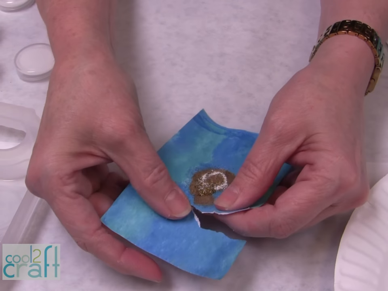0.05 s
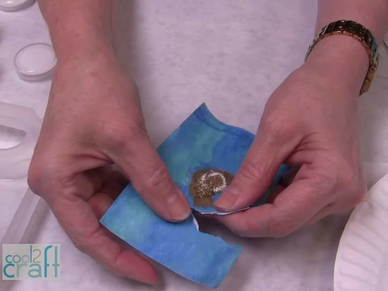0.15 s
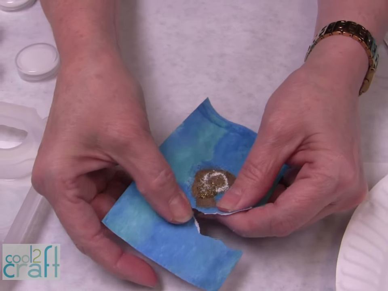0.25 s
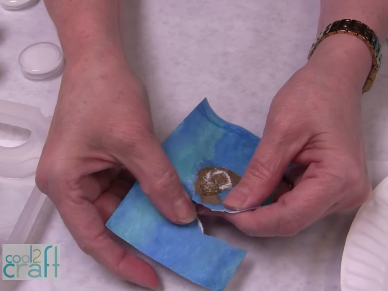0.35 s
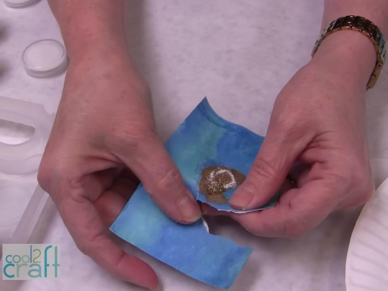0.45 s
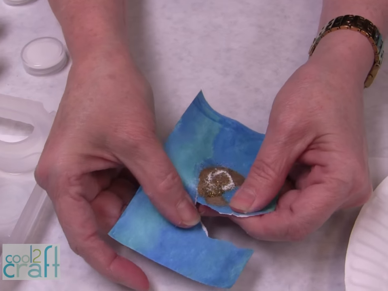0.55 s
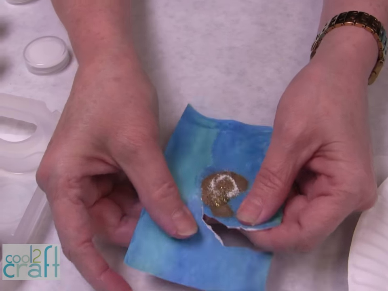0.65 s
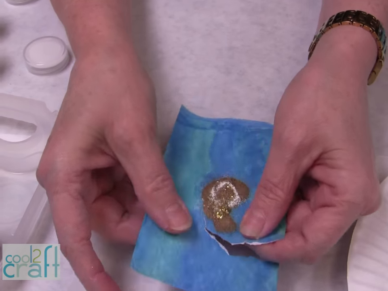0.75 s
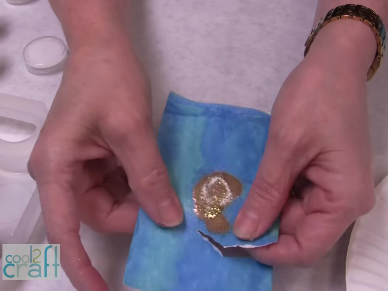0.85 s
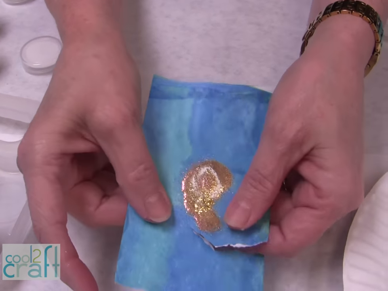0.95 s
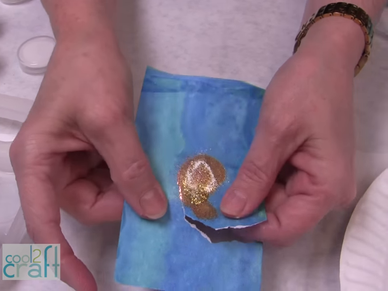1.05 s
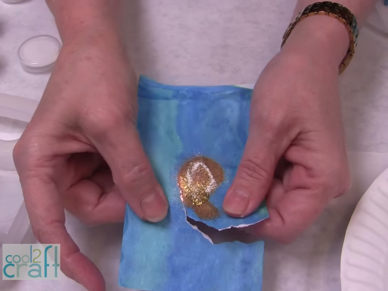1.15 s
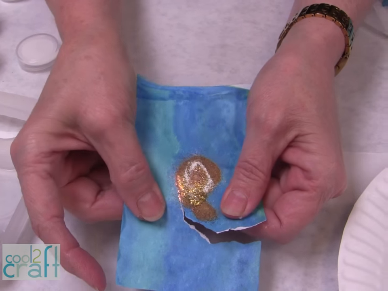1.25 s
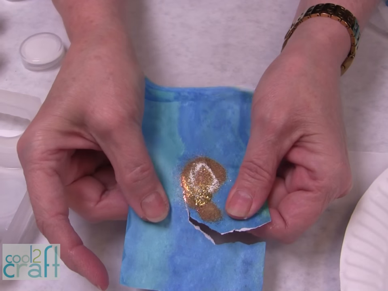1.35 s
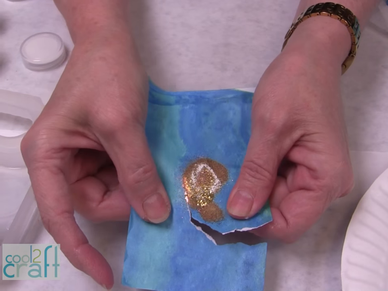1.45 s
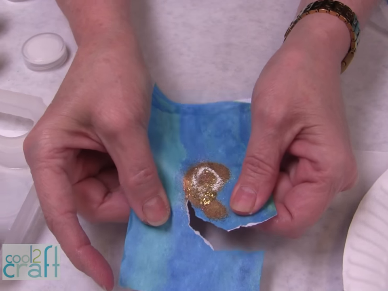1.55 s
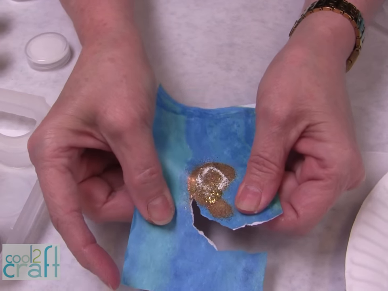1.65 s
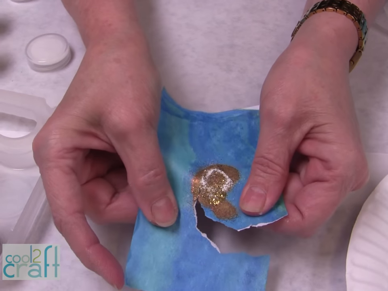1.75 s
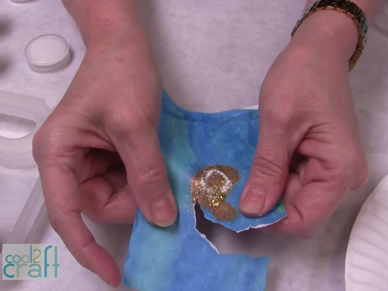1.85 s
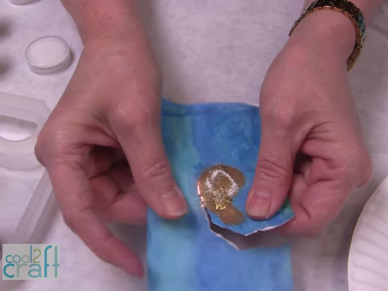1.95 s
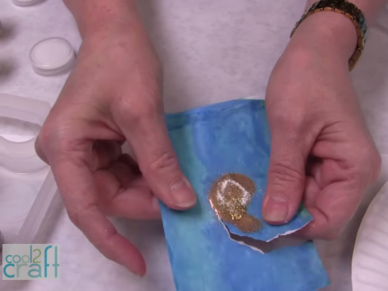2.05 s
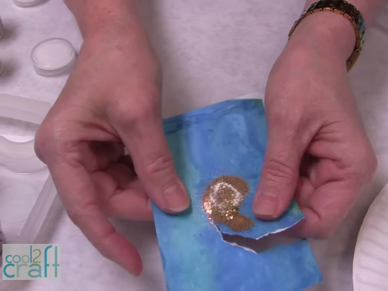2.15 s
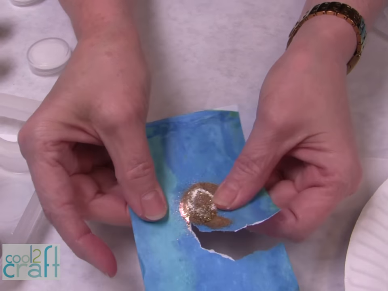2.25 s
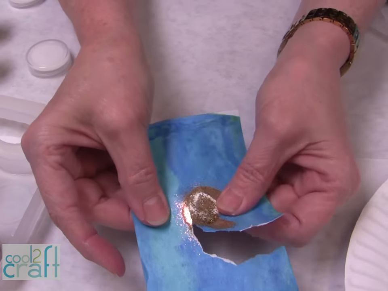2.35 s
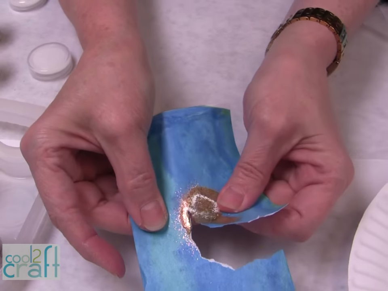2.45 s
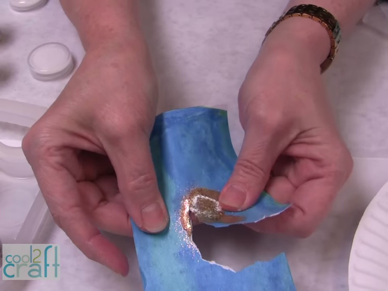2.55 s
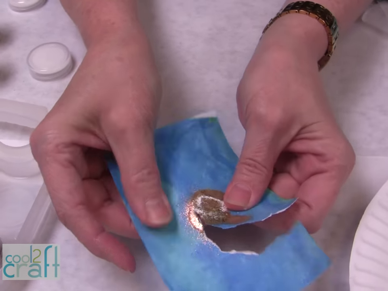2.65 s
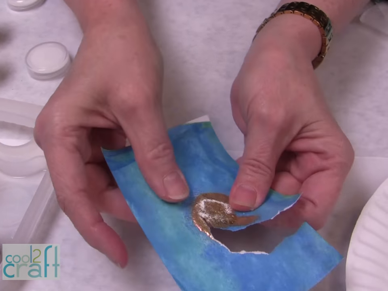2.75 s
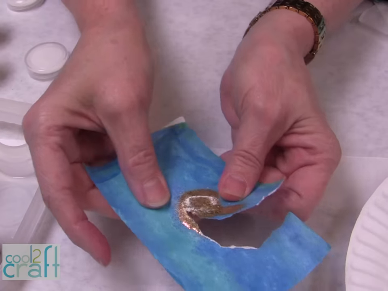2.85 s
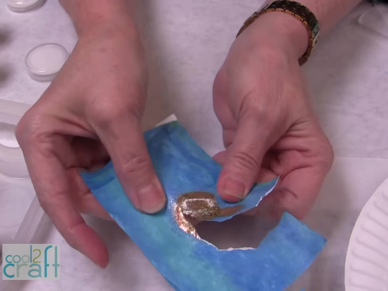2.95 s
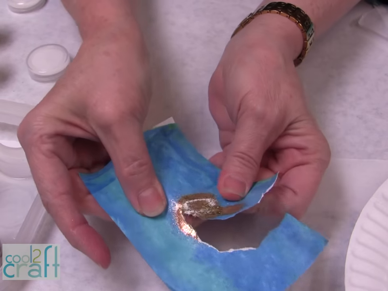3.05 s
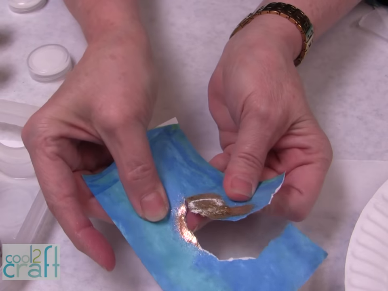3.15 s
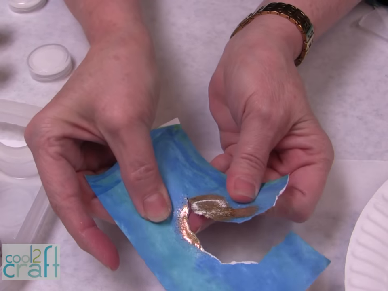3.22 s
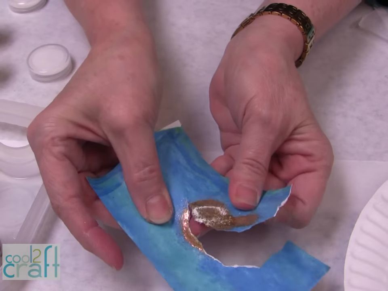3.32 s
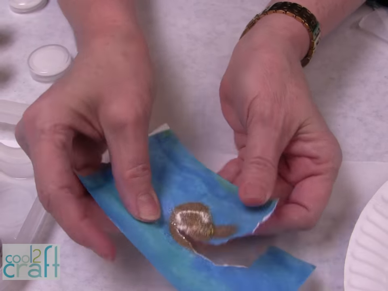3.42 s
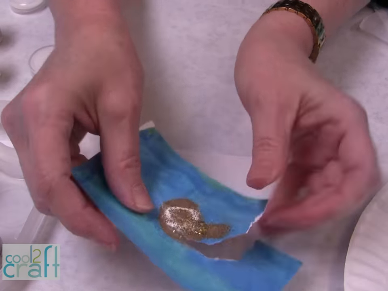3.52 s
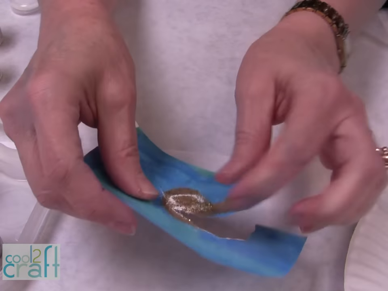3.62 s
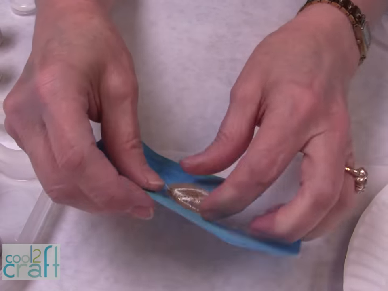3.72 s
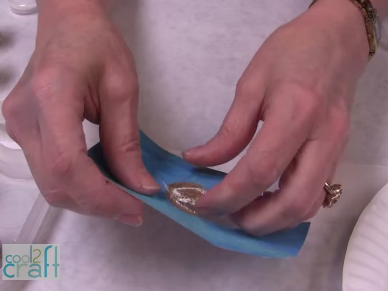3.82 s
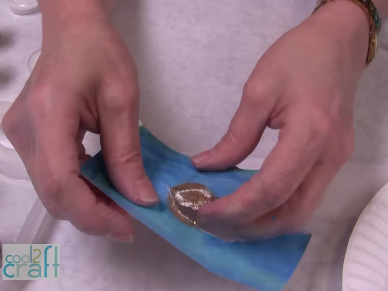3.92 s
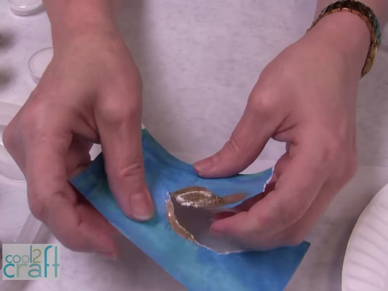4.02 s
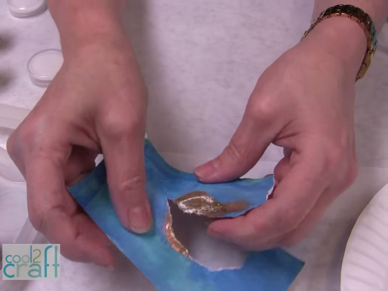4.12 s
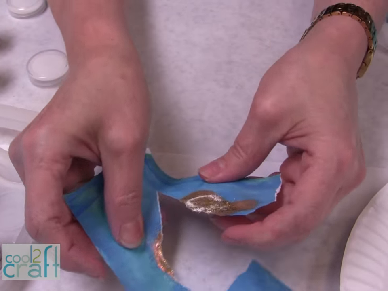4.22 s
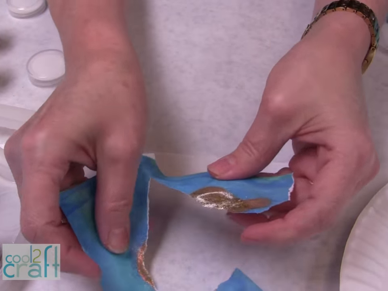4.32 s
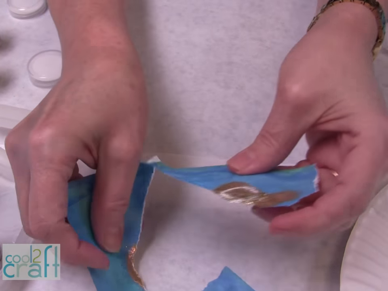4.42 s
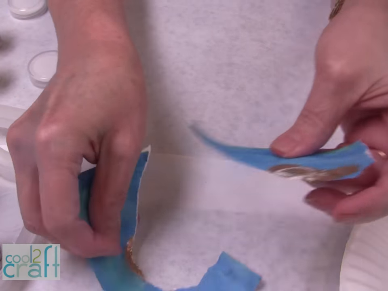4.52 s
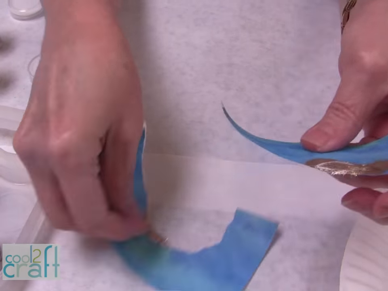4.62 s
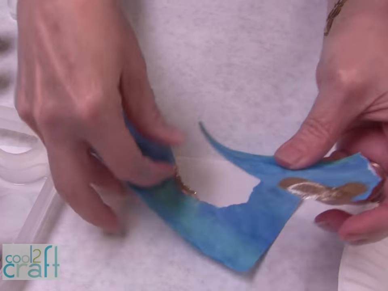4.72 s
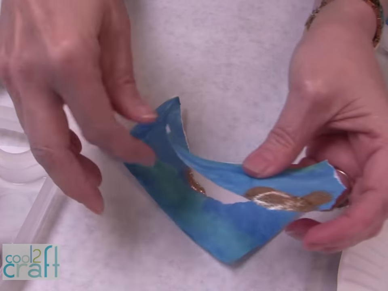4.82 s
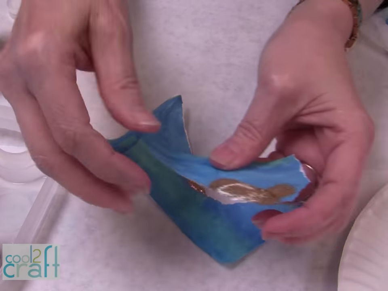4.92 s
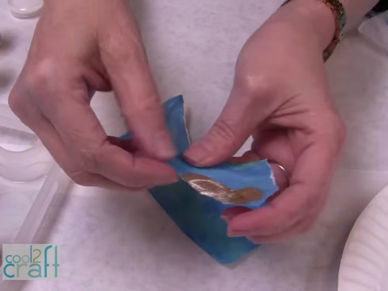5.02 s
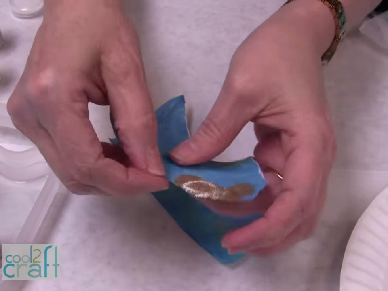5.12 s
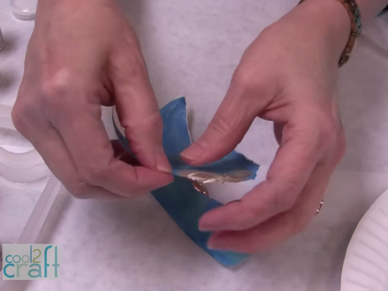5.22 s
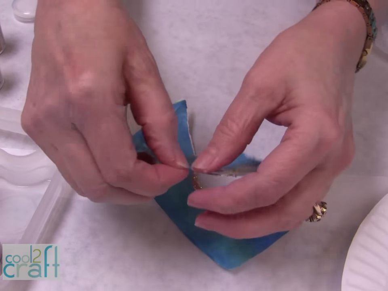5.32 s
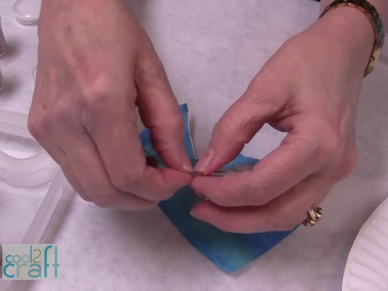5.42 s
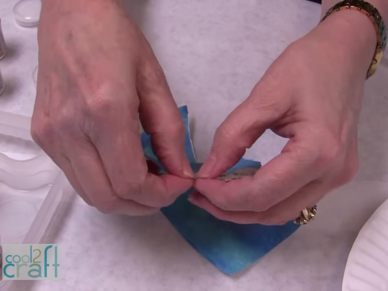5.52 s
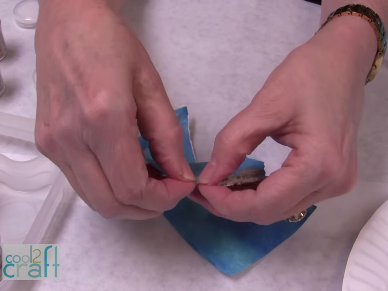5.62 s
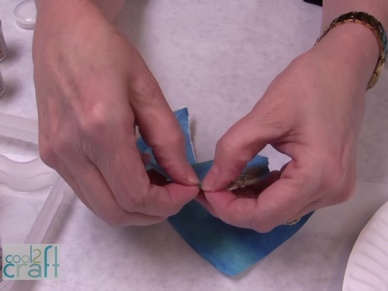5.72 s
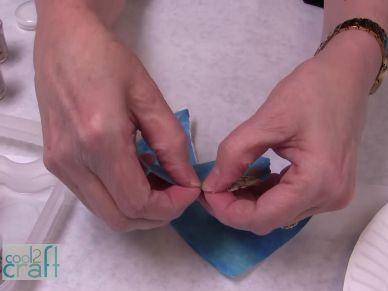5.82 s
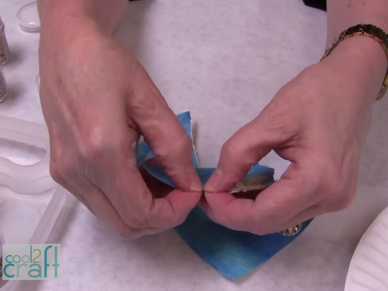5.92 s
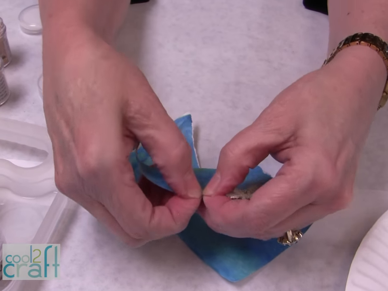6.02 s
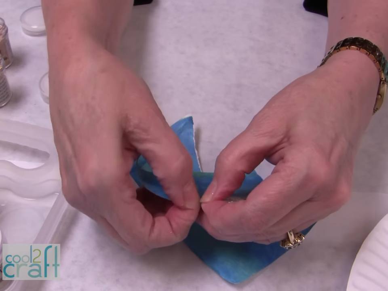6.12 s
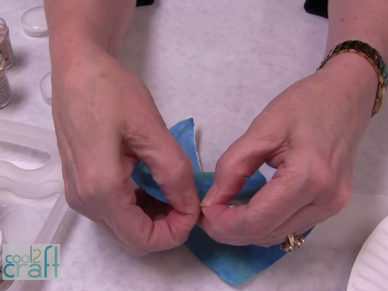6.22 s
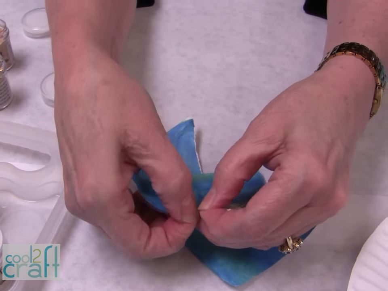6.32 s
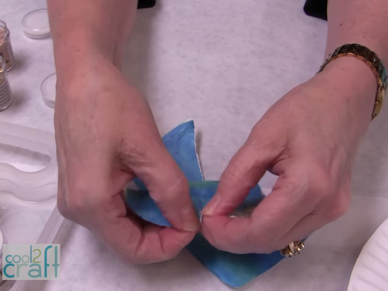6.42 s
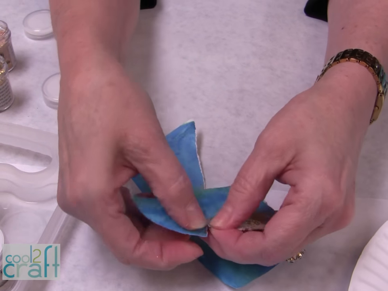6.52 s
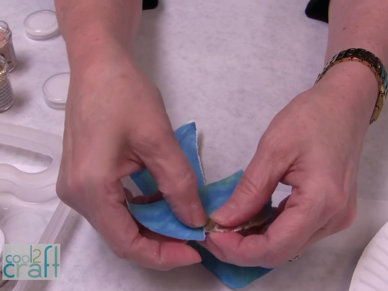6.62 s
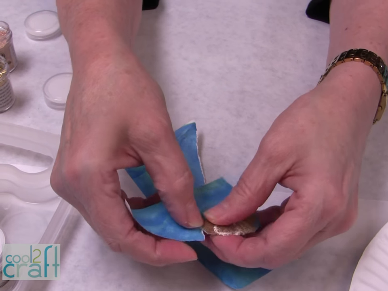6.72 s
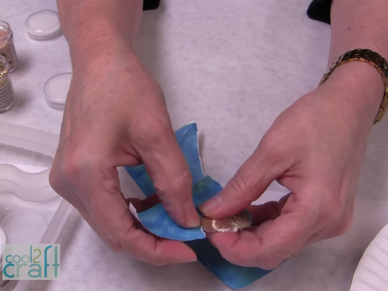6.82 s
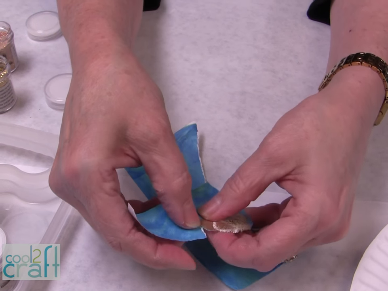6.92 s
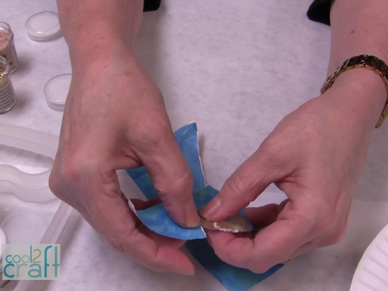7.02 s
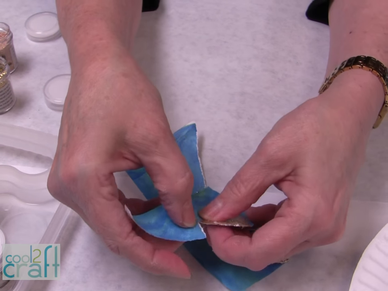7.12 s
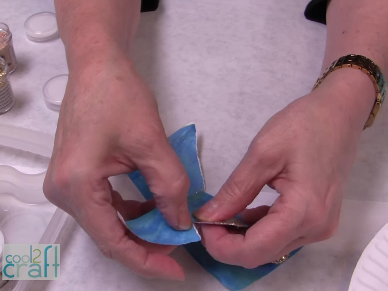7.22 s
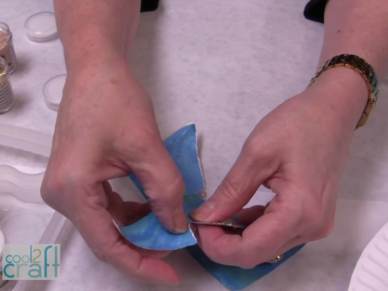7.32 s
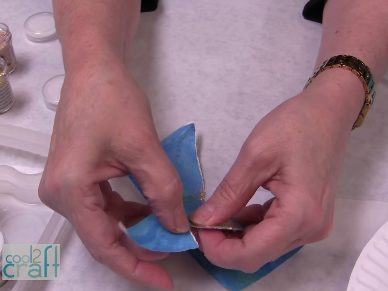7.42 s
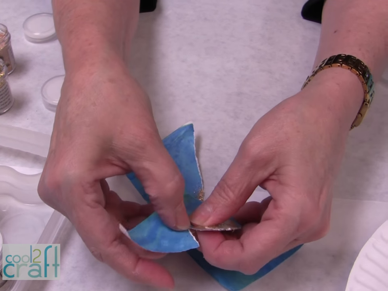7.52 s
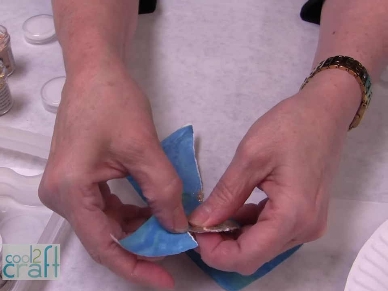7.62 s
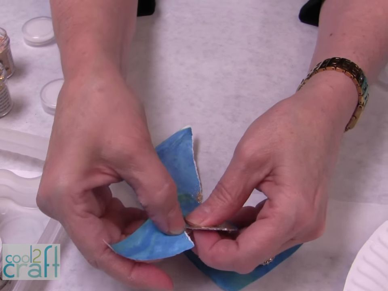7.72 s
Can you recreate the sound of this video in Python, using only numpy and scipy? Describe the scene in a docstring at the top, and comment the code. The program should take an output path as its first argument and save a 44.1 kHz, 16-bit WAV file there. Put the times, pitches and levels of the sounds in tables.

```python
"""A stiff painted card is torn by hand over a craft table in a small room, close to a nearly mono microphone.
Finger strokes and snaps of the bending card open the scene, and short rips advance the tear among them.
Past the middle comes one long pull; then a lull, a rip with the hardest snap, and two faint last rips.
Rips are bundles of fibres slipping unevenly, snaps are struck bending modes, strokes are grainy friction.
Rustle and a dull rumble of the hands come and go; room rumble and microphone hiss lie under it all."""
import sys
import numpy as np
from scipy import signal
from scipy.fft import rfft, irfft
from scipy.io import wavfile
from scipy.ndimage import uniform_filter1d

SR = 44100
rng = np.random.default_rng(int(sys.argv[2]) if len(sys.argv) > 2 else 0)


def inscribe(sig):
    """Save sig as 16-bit PCM at rate SR to the path in sys.argv[1].

    A 1-D sig is mono; a 2-D sig holds one channel per row.
    Samples are clipped to [-1, 1] before scaling.
    """
    pcm = np.round(np.clip(np.atleast_2d(sig).T, -1, 1) * 32767)
    wavfile.write(sys.argv[1], SR, pcm.astype(np.int16))


N = 342657
TIME = np.arange(N) / SR
HZ = np.maximum(np.fft.rfftfreq(4096, 1 / SR), 1)  # frequency grid of every filter

# Pulls that advance the tear: start t/s, rise t/s, hold t/s, relative level/dB,
# low edge of the flap's radiation f/Hz, ring level/dB, treble level/dB
PULLS = [ (0.302, 0.047, 0.023, -19, 1390, 12.5, 0.5), (0.55, .002, 0.089, -35.5, 810, 6, -1.5),
         (1.554, 0.064, 0.014, -22, 885, 6, -1.5), (2.485, 0.054, 0.0053, -24.5, 1534, 9, -3),
         (3.003, 0.042, .015, -32.5, 2257, 1, -5), (3.185, 0.03, 0.0084, -16, 1077, 3, 4.5),
         (3.426, 0.0037, .005, -24.5, 2010, -19, -0.5), (3.569, .014, 0.014, -24.5, 620, 7.5, -5.5),
         (4.187, 0.0031, 0.055, -23.5, 620, 14, 4.5), (4.218, 0.051, 0.0854, -16, 630, 1, 2),
         (4.361, 0.005, 0.0549, -24, 609.8, 9, 4), (4.435, .004, .104, -16.5, 600, 1.5, 2),
         (6.125, .002, .12, -50, 1100, 4, 1), (6.39, 0.016, 0.014, -19.5, 1395, -7, -5),
         (7.249, 0.061, 0.019, -36, 1350, -8, -1), (7.378, .008, 0.013, -34.5, 1370, 2, 4)]
# Spectral density of breaking fibres: f/Hz, level/dB per Hz
FIBRE_SPECTRUM = [(100, -14.5), (400, -2.5), (1000, -3), (2000, -5), (3300, -2.5), (4800, -3.5), (6500, -2),
                  (8500, -2.5), (10000, -3.5), (13000, -6.5), (16000, -14)]
RIP_RISE_DB, RIP_FALL_DB = 16.5, 32.5  # a pull builds up by this much, holds, then dies by this much
RELEASE_S, RELEASE_SHARE = .024, .6  # it dies in this time plus a share of its rise: a slow pull eases slowly
SLIPS_PER_S, SLIPS_AT_DB, SLIPS_FOLLOW = 175, -20, .45  # a faster tear is louder and slips more often
FLAP_HZ, FLAP_DB = 6140, 4  # upper resonance of the loose flap


def rips():
    """Stick-slip fracture: uneven slips over a fizz of single fibres, radiated by the flap each rip frees."""
    out = np.zeros(N)
    for start, rise_s, hold_s, db, edge_hz, ring_db, treble_db in PULLS:
        full = start + rise_s
        let_go = full + hold_s
        end = let_go + RELEASE_S + RELEASE_SHARE * rise_s
        t = np.arange(start - .005, end + .005, 1 / SR)
        pull_rows = [(start, db - RIP_RISE_DB), (full, db), (let_go, db), (end, db - RIP_FALL_DB)]
        pull = level(pull_rows, t, fade_s=0.0012)

        per_s = SLIPS_PER_S * from_db(SLIPS_FOLLOW * (db - SLIPS_AT_DB))
        slips = np.zeros(N)
        moments = np.cumsum(rng.gamma(2, .5 / per_s, size=160))
        for s in moments[moments < t[-1] - t[0]]:
            one_slip = slip(TIME[:SR // 100], spread_db=3.0, burst_s=0.0021, tint_db=7.0, travel_s=0.000611)
            add(slips, s, one_slip)
        fizz = from_db(-5.0) * grains(9000, 2.3, size=len(t))

        # a small flap cannot radiate long waves
        low_cut = -10 * np.log10(1 + (edge_hz / HZ) ** 4)
        ring_hz = bend_hz(full)
        rings = ring_db * bump(ring_hz, ring_hz / 3) + FLAP_DB * bump(FLAP_HZ, FLAP_HZ / 3)
        shape_db = spectrum(FIBRE_SPECTRUM) + low_cut + rings + treble_db * shelf(5900)
        sound = colour(rms_one(slips[:len(t)]) + fizz, shape_db)
        add(out, t[0], evened(sound, window_s=0.022) * pull)
    return from_db(-2.0) * out


def slip(t, spread_db, burst_s, tint_db, travel_s):
    """Decaying impulse train: one bundle breaks fibre by fibre, with a strength and a pitch of its own."""
    burst = grains(9000, 2.1, size=len(t)) * np.exp(-t / burst_s)
    burst[0] += rng.choice([-2, 2])
    hz = np.exp(rng.uniform(np.log(1200), np.log(9000)))
    sound = colour(burst, tint_db * bump(hz, .5 * hz), travel_s * rng.uniform(0.46, 2.014))
    return from_db(spread_db * rng.uniform(-1.0, 1)) * rms_one(sound)


# The card buckles or a thick bundle breaks: t/s, relative peak level/dB, pitch f/Hz, treble level/dB
BUCKLES = [(0.136, -20.5, 2530, -11), (0.303, -21, 2770, 11), (0.343, -24, 3160, -18),
           (0.737, -14.5, 2770, -50), (0.781, -16, 2920, -35), (0.793, -16.5, 2300, -43),
           (0.961, -14, 1440, -1.5), (1.423, -9.5, 1254, -7), (1.619, -5, 7200, -1),
           (2.039, -13.5, 1440, -13), (2.299, -16.5, 2570, -12), (2.368, -26, 1040, -6),
           (2.529, -7.5, 3656, -12.5), (2.722, -14, 1270, 0), (2.833, -25.5, 1079, -5),
           (2.975, -29, 1010, -11.5), (3.056, -18.5, 5600, -2), (3.209, -2, 7650, -1.5),
           (3.741, -12, 1400, -8), (3.811, -22.5, 1350, -14), (3.943, -26, 2020, -24),
           (4.04, -19.5, 3880, -7), (4.163, -16.5, 6338, -5), (4.188, -15, 1420, -13),
           (4.406, -8.5, 6010, -17), (4.537, -1, 5282, 7), (4.707, -13.5, 2850, -6.5),
           (4.828, -21, 5270, 2), (5.07, -17, 3480, -12.5), (5.094, -17.5, 1170, -5),
           (5.174, -24.5, 1200, -3.5), (6.146, -22.5, 1380, 0.5), (6.406, 2, 2670, -15),
           (6.484, -15.5, 5100, 2), (6.562, -13.5, 5470, 1), (7.738, -24, 3670, -3.5)]
# Spectral density of a snap: f/Hz, level/dB per Hz
SNAP_SPECTRUM = [(60, -20), (300, -12), (600, -8.5), (900, -4), (1500, -0.5), (3000, -2), (5000, 2.5),
                 (8000, 2.5), (12000, -7.5), (16000, -20.5)]
SNAP_BASS_DB, SNAP_BASS_DB_PER_OCTAVE = 5.5, -6  # at a pitch of 1 kHz; a small, high buckle moves less air
SETTLE_DB, SETTLE_S = -33, 0.03  # settling rustle: level under the peak, decay time


def snaps():
    """Impulse response of a buckling plate: a pulse in a short crackle rings two bending modes, then settles."""
    out = np.zeros(N)
    t = TIME[:SR // 6]
    for s, peak_db, hz, treble_db in BUCKLES:
        force = 0.11 * rng.standard_normal(len(t)) * np.exp(-t / 0.0047)
        force[SR // 1500] += 1
        bass_db = SNAP_BASS_DB + SNAP_BASS_DB_PER_OCTAVE * np.log2(hz / 1000)
        tilt = treble_db * shelf(5070) + bass_db * bump(580, 1600)
        rings = 10.0 * bump(hz, 0.17 * hz) + 9 * bump(3.29 * hz, 0.29 * hz)
        # a harder snap throws more of the sheet and so sounds fuller
        fullness = 0.9 * from_db(peak_db) * bump(2500, 1500)
        sound = colour(force, spectrum(SNAP_SPECTRUM) + rings + tilt + fullness, travel_s=.0008)
        sound /= np.abs(sound).max()
        rubbing = friction(0.86, size=len(t))
        rustle = rms_one(colour(rubbing, spectrum(SNAP_SPECTRUM) + tilt + 0.7 * rings))
        settling = from_db(SETTLE_DB) * rustle * np.exp(-t / SETTLE_S)
        add(out, s, from_db(peak_db) * (sound + settling))
    return from_db(-1.0) * out


# The fingers shift their grip: start t/s, length t/s, slide relative level/dB,
# slide resonance f/Hz, creak relative level/dB
GRIP_SHIFTS = [ (0, 0.064, -43.5, 6900, -40.5), (0.133, 0.059, -52, 6500, -47),
               (0.402, 0.09, -40, 6350, -40.5), (0.649, 0.095, -36, 5820, -42.5),
               (.785, .11, -36.5, 6800, -38.5), (.917, 0.057, -37.5, 5500, -29),
               (0.986, 0.086, -38.5, 5500, -36), (1.073, 0.11, -51, 6000, -65),
               (1.781, 0.06, -42, 6300, -50.5), (1.929, 0.16, -36.5, 4400, -37),
               (2.134, 0.026, -36.5, 6660, -40), (2.181, 0.062, -46, 6450, -49),
               (2.241, 0.051, -33.5, 6800, -39), (2.414, 0.094, -43, 6660, -46.5),
               (2.632, .11, -37, 5850, -37.5), (2.842, 0.084, -46.5, 5000, -50.5),
               (3.072, 0.11, -36, 6500, -48), (3.245, 0.11, -46.5, 6500, -45),
               (3.378, 0.098, -42, 5810, -45.5), (3.484, 0.044, -38, 6090, -48.5),
               (3.604, 0.086, -43.5, 6103, -56), (3.745, 0.013, -28.5, 4600, -27),
               (3.798, 0.097, -35.5, 5000, -41.5), (3.881, 0.062, -40, 4900, -52),
               (3.945, 0.054, -35.5, 5300, -41.5), (4.0, 0.066, -48, 4200, -49.5),
               (4.145, 0.036, -36, 6490, -44.5), (4.546, 0.088, -32.5, 6000, -49),
               (4.627, 0.17, -27, 6280, -41.5), (4.845, 0.04, -37, 5430, -64),
               (5.089, 0.075, -45.5, 4000, -50), (5.545, .045, -59, 4000, -51),
               (5.666, 0.18, -47.5, 3970, -57.5), (5.996, 0.048, -52, 4205, -54),
               (6.349, 0.033, -33, 7490, -40), (6.431, 0.11, -38, 5000, -46),
               (6.555, 0.18, -40.5, 5140, -54), (6.728, 0.2, -47.5, 4540, -50.5),
               (6.994, 0.19, -46.5, 5700, -56.5), (7.198, 0.32, -45.5, 6112, -65),
               (7.48, 0.084, -38.5, 5750, -46.5)]
# Faint rustle of the held card: t/s, relative level/dB
HELD_RUSTLE = [(0, -54.5), (1.0, -46.5), (1.3, -63), (2.0, -58), (3.1, -55), (4.6, -56), (4.95, -68.5),
               (5.3, -62.5), (6.1, -64.5), (6.6, -41), (7.0, -68.5), (7.77, -59)]
# Spectral density of skin sliding over paint: f/Hz, level/dB per Hz
SLIDE_SPECTRUM = [(800, -23), (2000, -22.5), (3200, -3.5), (4500, -1.5), (6500, -2.5), (8500, -2.5),
                  (10500, -5.5), (13000, -8), (16000, -13.5)]
# Spectral density of the creaking card: f/Hz, level/dB per Hz
CREAK_SPECTRUM = [(150, -20), (350, -8), (550, -10), (800, -5.5), (1400, -2.5), (2400, -2), (3400, 1),
                  (5000, -26.5), (10000, -31)]
STROKE_PEAK_SHARE = 0.74  # a stroke swells to this point of its length, then eases
STROKE_RISE_DB, STROKE_FALL_DB = 7.5, 8.5
ROUGHNESS = 0.39  # amplitude share of coarse catches under a sliding finger
HISS_GROWTH = 1.2  # the hiss grows faster with finger speed than the creak
SLIDE_TOP_RATIO, SLIDE_TOP_DB = 2.3, -4  # the hiss dulls above this multiple of its resonance


def handling():
    """Friction-driven resonance: skin hisses over the paint and the card creaks at the resonance of its bend."""
    rustle_db = np.maximum(spectrum(SLIDE_SPECTRUM), spectrum(CREAK_SPECTRUM))
    rustle = rms_one(colour(friction(0.81, size=N), rustle_db))
    out = level(HELD_RUSTLE, TIME, fade_s=.01) * rustle
    for start, length_s, slide_db, slide_hz, creak_db in GRIP_SHIFTS:
        peak, end = start + STROKE_PEAK_SHARE * length_s, start + length_s
        t = np.arange(max(start - .02, 0), end + .02, 1 / SR)
        force = colour(friction(ROUGHNESS, size=len(t)), grip_modes())

        dull = SLIDE_TOP_DB * shelf(SLIDE_TOP_RATIO * slide_hz)
        slide_rings = 4 * bump(slide_hz, 0.39 * slide_hz) + 7 * shelf(0.4 * slide_hz)
        slide = rms_one(colour(force, spectrum(SLIDE_SPECTRUM) + dull + slide_rings, travel_s=0.000833))

        creak_hz = bend_hz(peak)
        creak_ring = 8 * bump(creak_hz, 1.5 * creak_hz)
        creak = rms_one(colour(force, spectrum(CREAK_SPECTRUM) + creak_ring, travel_s=0.001594))

        stroke_rows = [(start, -STROKE_RISE_DB), (peak, 0), (end, -STROKE_FALL_DB)]
        swell = flutter(t) * level(stroke_rows, t, fade_s=0.0022)
        hiss = swell ** HISS_GROWTH * from_db(slide_db) * slide
        add(out, t[0], hiss + swell * from_db(creak_db) * creak)
    return from_db(-2.0) * out


def friction(roughness, size):
    """Asperity contact: fine grains of sliding, with coarser catches where the skin meets rough spots."""
    share = roughness ** 2
    catches = evened(grains(330, 5.4, size=size), window_s=0.072)
    return np.sqrt(1 - share) * grains(9000, 3.0, size=size) + np.sqrt(share) * catches


GRIP_MODE_DB, GRIP_MODE_WIDTH = 3.5, .14  # largest peak or dip, and width over pitch


def grip_modes(count=14):
    """Boundary conditions set the modes: every grip gives the sheet other small peaks and dips (dB)."""
    centres = np.geomspace(900, 11000, count) * rng.uniform(.9, 1.1, count)
    return sum(GRIP_MODE_DB * rng.uniform(-1, 1) * bump(hz, GRIP_MODE_WIDTH * hz) for hz in centres)


FLUTTER_DB, FLUTTER_PER_S = 3, 58.7  # standard deviation of the random points, and their rate


def flutter(t):
    """Random amplitude modulation: the gain of a finger pressure that is never steady."""
    knots = np.arange(400) / FLUTTER_PER_S
    return from_db(FLUTTER_DB * np.interp(t - t[0], knots, rng.standard_normal(len(knots))))


# The hands bend the card; its free span rings higher the tighter it is held: t/s, resonance f/Hz
BEND_RESONANCE = [(0, 2110), (.3, 2890), (.6, 3300), (.8, 2448), (1.05, 1570), (2.0, 1570), (2.52, 2304),
                  (2.75, 1340), (3.8, 1391), (4.25, 2489), (4.8, 2580), (5.1, 1200), (5.57, 790),
                  (5.75, 2004), (6.1, 1706), (6.5, 2780), (6.85, 1800), (7.77, 2220)]


def bend_hz(s):
    """Stiffening by curvature: resonance of the bent card at time s."""
    return np.interp(s, *np.transpose(BEND_RESONANCE))


# Dull rumble of the moving hands: t/s, relative level/dB
HAND_LEVEL = [(0, -59), (.7, -73), (1.05, -60), (1.5, -64.5), (2.2, -62), (2.9, -62), (3.7, -60),
              (4.3, -62.5), (4.8, -54), (5.1, -79), (5.5, -55), (6.0, -81.5), (7.0, -78), (7.45, -60.5),
              (7.77, -73)]
# Spectral density of that rumble: f/Hz, level/dB per Hz
HAND_SPECTRUM = [(30, -19), (80, 1), (200, 3), (400, -5.5), (900, -13), (3000, -56.5)]


def hands():
    """Low-passed shot noise: moving hands and sleeves make a soft, low rumble."""
    rumble = rms_one(colour(grains(600, 3.0, size=N), spectrum(HAND_SPECTRUM)))
    return level(HAND_LEVEL, TIME, fade_s=.01) * rumble


def echoes(near_db, near_t60, far_db, far_t60):
    """Exponential decay of sound: quick scatter from hands and table, then the room's faint, duller tail."""
    t = TIME[:SR // 2]
    near = rng.standard_normal(len(t)) * from_db(-60 * t / near_t60) * (t > .002)
    far = rng.standard_normal(len(t)) * from_db(-60 * t / far_t60) * (t > .007)
    far = colour(far, -4 * shelf(5700))
    return (from_db(near_db) * rms_one(near) + from_db(far_db) * rms_one(far)) / np.sqrt(len(t))


# Spectral density of room rumble and microphone hiss: f/Hz, level/dB per Hz
AIR_SPECTRUM = [(12, -38.5), (20, -9.5), (130, -3), (210, -9.5), (255, -11.5), (293, -10.5), (377, -13.5),
                (472, -14), (542, -16.5), (780, -18), (1290, -22), (1860, -23.5), (2140, -22.5),
                (2390, -23.5), (16000, -29.5)]
# Side relative to mid: f/Hz, level/dB
AIR_SIDE_SPECTRUM = [(30, -10), (200, -11), (600, -4), (2000, -4), (8000, -14.5), (16000, -32)]
AIR_DB = -56


def air():
    """Stationary Gaussian noise: steady room rumble and microphone hiss, with independent mid and side."""
    mid, side = [rms_one(colour(rng.standard_normal(N), spectrum(AIR_SPECTRUM))) for part in range(2)]
    side = colour(side, spectrum(AIR_SIDE_SPECTRUM))
    return from_db(AIR_DB) * (mid + side * np.array([[1], [-1]]))


def from_db(db):
    """Logarithmic level: decibels to amplitude gain."""
    return 10 ** (np.asarray(db) / 20)


def rms_one(x):
    """Mean-square normalisation: scale to unit power."""
    return x / np.sqrt(np.mean(x ** 2) + 1e-20)


def add(out, s, sound):
    """Linear superposition: mix a sound in at time s."""
    start = max(int(s * SR), 0)
    out[start:start + len(sound)] += sound[:N - start]


def level(rows, t, fade_s):
    """Amplitude envelope: gain along rows of (t/s, level/dB), with Gaussian fades beyond both ends."""
    s, db = np.transpose(rows)
    outside = np.maximum(np.maximum(s[0] - t, t - s[-1]), 0)
    return from_db(np.interp(t, s, db)) * np.exp(-(outside / fade_s) ** 2)


def spectrum(points):
    """Spectral envelope: join (f/Hz, level/dB) points on a log-frequency axis."""
    hz, db = np.transpose(points)
    return np.interp(np.log(HZ), np.log(hz), db)


def bump(hz, width_hz):
    """Lorentzian resonance curve, 1 on top."""
    return 1 / (1 + (2 * (HZ - hz) / width_hz) ** 2)


def shelf(hz):
    """Shelving curve: rises from 0 below hz to 1 above."""
    return 1 - 1 / (1 + (HZ / hz) ** 4)


def colour(x, db, travel_s=0):
    """Minimum-phase filter plus dispersion: bending waves need travel_s at 1 kHz, higher ones arrive sooner."""
    # folding the cepstrum onto positive times makes the filter causal
    cepstrum = irfft(np.log(from_db(db)))
    cepstrum[1:len(HZ) - 1] *= 2
    cepstrum[len(HZ):] = 0
    lag = 4 * np.pi * travel_s * np.sqrt(1000 * HZ)  # phase in radians
    response = irfft(np.exp(rfft(cepstrum) - 1j * lag))
    return signal.oaconvolve(x, response)[:len(x)]


def grains(per_s, spread_db, size):
    """Shot noise: tiny clicks at random moments, of uneven size and either sign."""
    sizes = from_db(spread_db * np.minimum(rng.exponential(1, size), 4))
    return rms_one((rng.random(size) < per_s / SR) * sizes * rng.choice([-1, 1], size))


def evened(x, window_s):
    """Short-time power normalisation: only the unevenness faster than the window stays."""
    power = uniform_filter1d(x ** 2, max(int(window_s * SR), 2))
    return x / np.sqrt(np.maximum(power, 1e-9))


# Resonances that colour everything the card does: f/Hz, width f/Hz, level/dB
BODY_MODES = [(623, 30, 2.5), (865.5, 32, 6), (1225, 8.4, 5.5), (1707, 130, 1.5), (2080, 43, 5),
              (2520, 220, -2.5), (4305, 170, -3.5), (5960, 390, 1), (6850, 86, 2.5)]


def scene():
    """Source-filter chain: card and hands share the card's modes; echoes and air differ between channels."""
    body = sum(db * bump(hz, width_hz) for hz, width_hz, db in BODY_MODES)
    card = colour(rips() + snaps() + handling() + hands(), body)
    mid, side = [
        signal.oaconvolve(card, echoes(near_db=-12.5, near_t60=0.027, far_db=-17.5, far_t60=0.25))[:N]
        for part in range(2)]
    return card + mid + from_db(-22.5) * side * np.array([[1], [-1]]) + air()


CUTOFF_HZ = 16000


def record(dry):
    """Overload and band limit: peaks beyond full scale are clipped, then a steep low-pass cuts the top."""
    low_pass = signal.ellip(12, .1, 80, CUTOFF_HZ, fs=SR, output="sos")
    return signal.sosfilt(low_pass, np.clip(dry, -1, 1))


dry = scene()
out = record(dry)
inscribe(out)
```